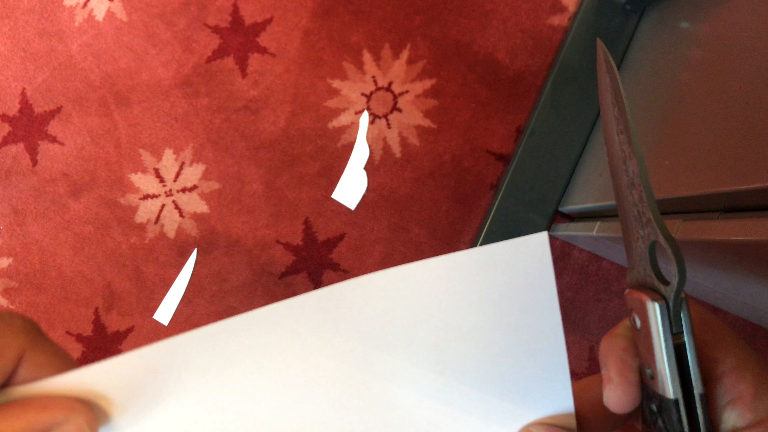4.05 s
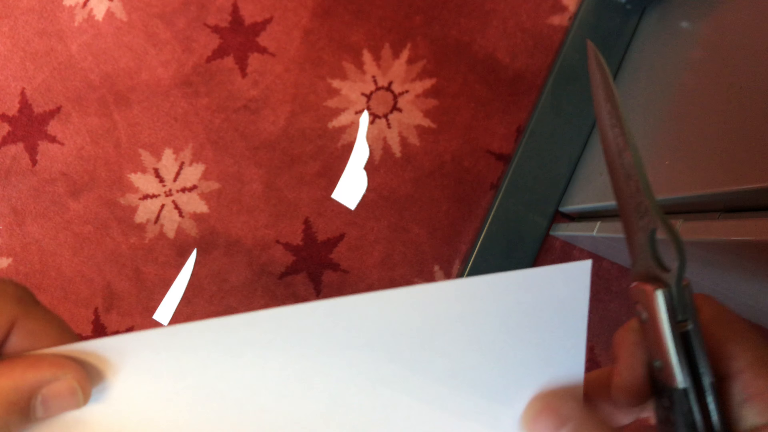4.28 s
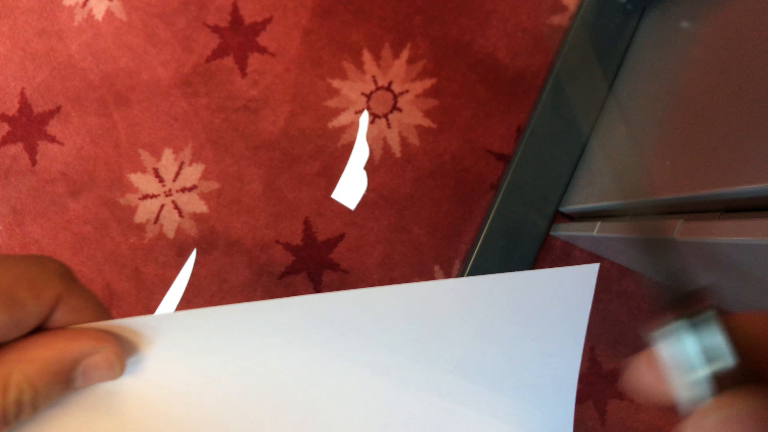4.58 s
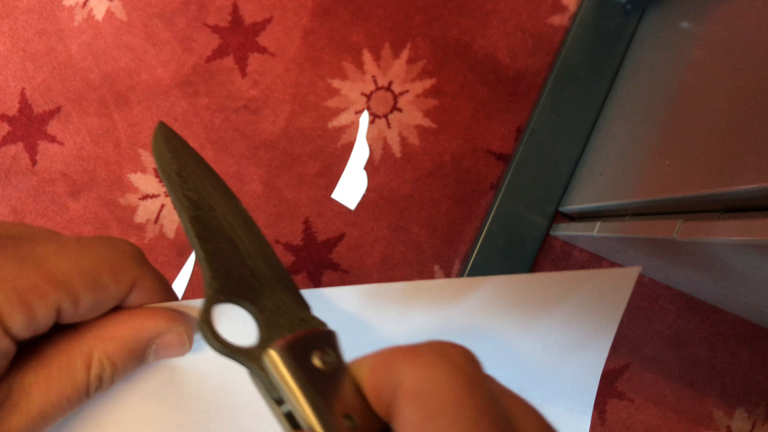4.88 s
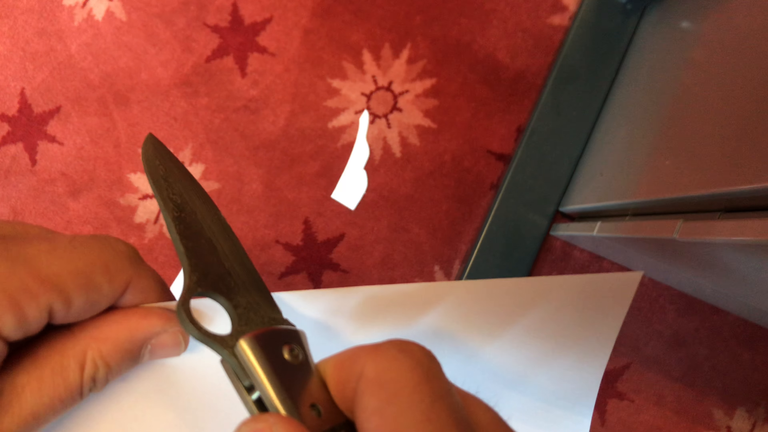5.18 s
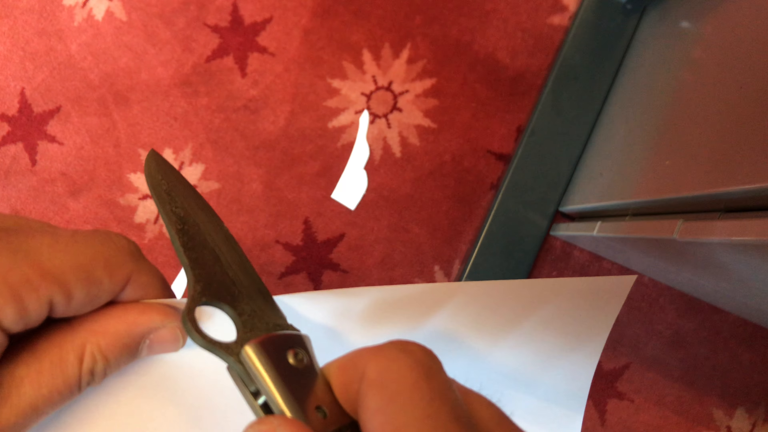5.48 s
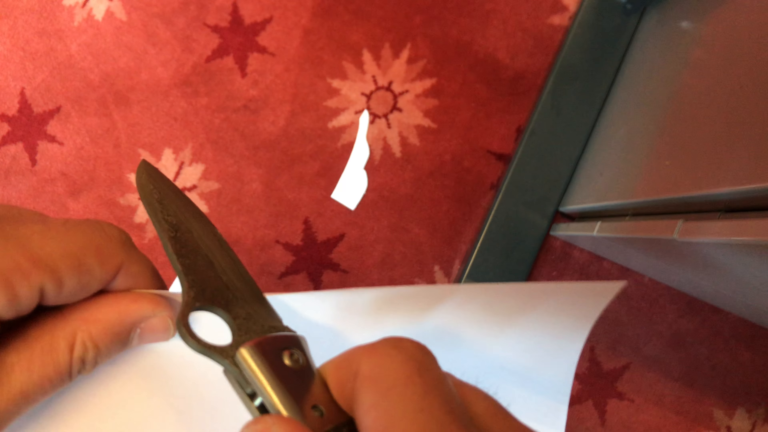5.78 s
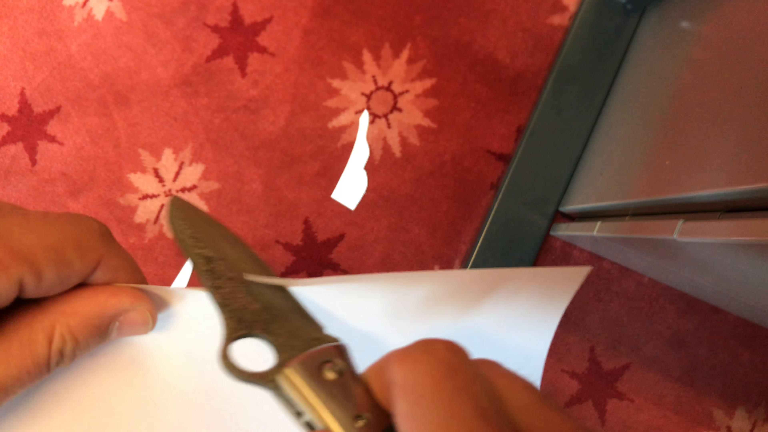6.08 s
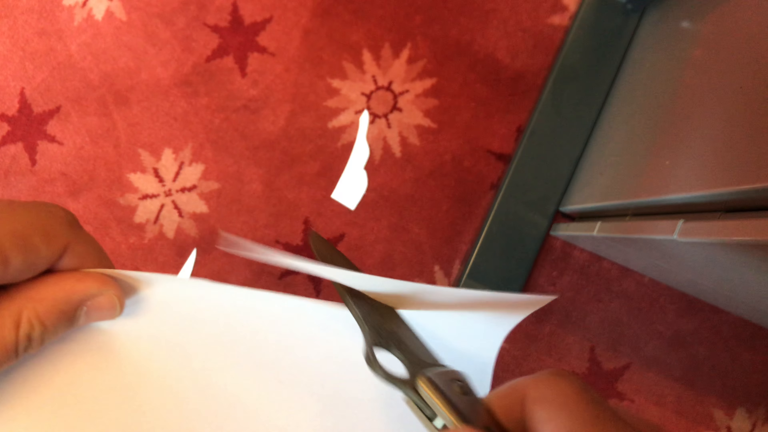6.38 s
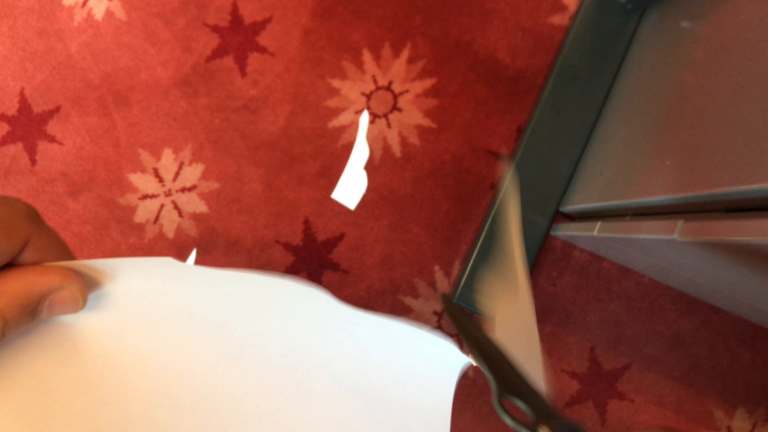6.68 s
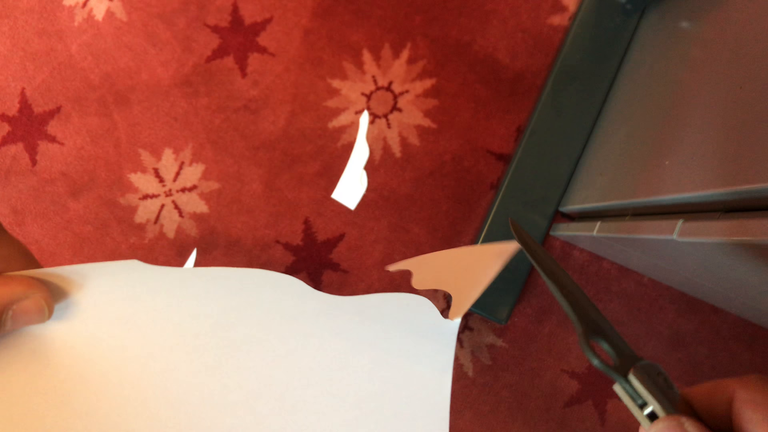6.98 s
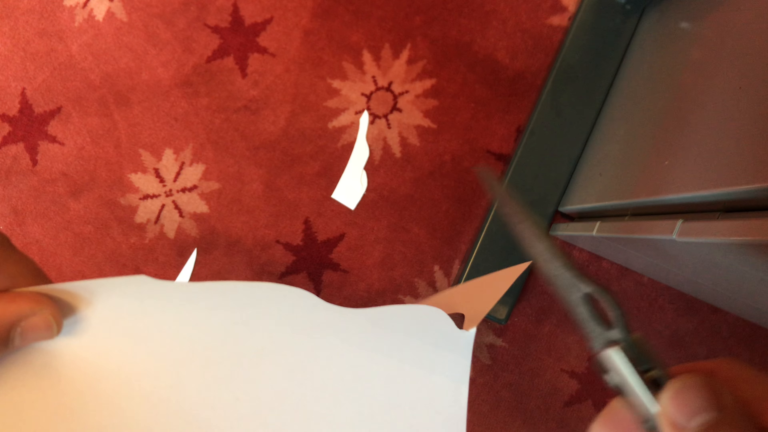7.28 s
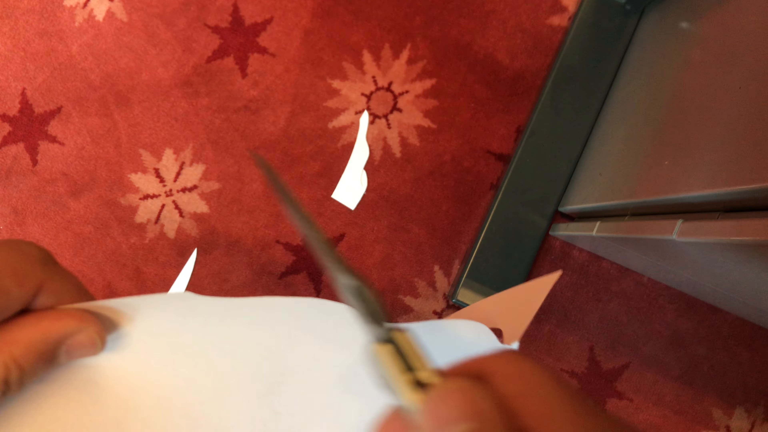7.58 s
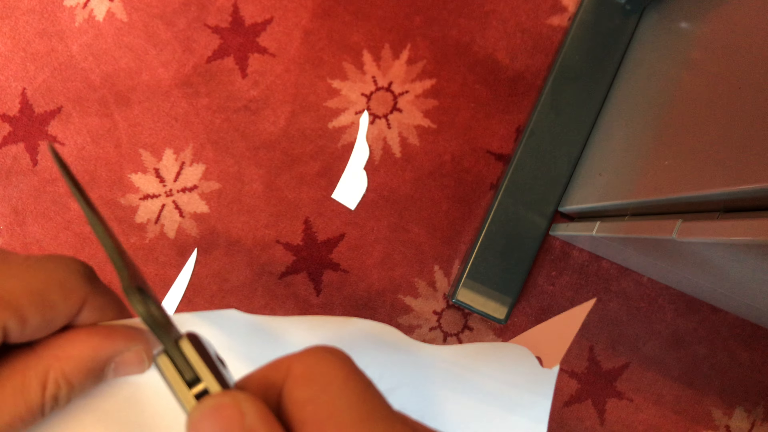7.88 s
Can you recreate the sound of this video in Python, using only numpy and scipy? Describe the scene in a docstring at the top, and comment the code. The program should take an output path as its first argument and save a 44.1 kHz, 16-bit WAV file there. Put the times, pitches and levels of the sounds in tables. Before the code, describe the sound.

Close up in a small, quiet room, a knife cuts twice through a hand-held sheet of paper. The first slice is coarse and crackly, followed by a light metallic click. Between the cuts the paper is shifted about, hissing against the skin and buckling with crisp snaps. After a lull, the blade grazes the rim and runs through in a bright, hissing stroke. Soft handling noises trail off over a faint mains hum.

```python
"""Slicing paper with a knife

A sharp folding knife cuts twice through a sheet of paper, close by in a small room. Each cut is a dense
train of parting fibres that the sheet radiates; before the second, the edge grazes the rim. Between the
cuts the sheet slides in the fingers, flexes and snaps, and the knife clicks once. Mains hum lies below."""
import sys
import numpy as np
from scipy import signal
from scipy.fft import rfft, irfft, next_fast_len
from scipy.io import wavfile
from scipy.ndimage import uniform_filter1d, map_coordinates

SR = 44100
rng = np.random.default_rng(int(sys.argv[2]) if len(sys.argv) > 2 else 0)


def put_to_file(sound):
    """Save the sound as 16-bit audio at rate SR, in the file named by the first command-line argument."""
    columns = np.atleast_2d(sound).T  # one column per channel
    safe = np.clip(columns, -1, 1)
    whole_steps = np.round(safe * 32767)
    wavfile.write(sys.argv[1], SR, whole_steps.astype(np.int16))


N = 358974


def amp(db):
    """Decibels to amplitude ratio."""
    return 10 ** (np.asarray(db) / 20)


def unit(x):
    """Normalisation to rms 1."""
    return x / np.sqrt(np.mean(x ** 2) + 1e-20)


def along(points, hz):
    """Interpolation of (Hz, value) points on a logarithmic frequency axis."""
    f, v = np.transpose(points)
    return np.interp(np.log(hz + 1), np.log(f + 1), v)


def seconds():
    """The time of every sample."""
    return np.arange(N) / SR


def stroke(start, length, db, growth_db, attack, release):
    """Envelope of a hand movement: linear onset, even slope in dB, exponential decay."""
    age = seconds() - start
    travel = np.clip(age / length, 0, 1) - .5
    onset = np.clip(age / attack + .5, 0, 1)
    return onset * amp(db + growth_db * travel) * np.exp(-np.maximum(age - length, 0) / release)


def swell(age, half):
    """Gaussian envelope about age 0; the half length is its standard deviation."""
    return np.exp(-.5 * np.minimum((age / half) ** 2, 100))


def wobble(rate):
    """Smooth random modulation, with rate knots a second."""
    return map_coordinates(rng.standard_normal(int(N * rate / SR) + 4), [np.arange(N) * rate / SR])


def filtered(x, response):
    """Linear filtering: the spectrum of x times a frequency response."""
    m = next_fast_len(N + 8192)
    return irfft(rfft(x, m) * response(np.fft.rfftfreq(m, 1 / SR)), m)[:N]


def coloured(x, spectrum, peaks=()):
    """Source and filter: x through a broad spectrum with Lorentzian resonances, at rms 1."""
    lift = lambda hz: sum(db / (1 + (2 * (hz - centre) / width) ** 2) for centre, width, db in peaks)
    return unit(filtered(x, lambda hz: amp(along(spectrum, hz) + lift(hz))))


def band(x, centre_hz, width_hz):
    """Band-pass filtering: one resonance of x, at rms 1."""
    return unit(filtered(x, lambda hz: 1 / (1 + (2 * (hz - centre_hz) / width_hz) ** 4)))


def under(hz, edge_hz):
    """A steep low-pass response."""
    return 1 / (1 + (hz / edge_hz) ** 10)


def registers(x, low_hz, high_hz):
    """A crossover: the low, middle and high bands of x, each at rms 1."""
    parts = (lambda hz: under(hz, low_hz),
             lambda hz: under(hz, high_hz) - under(hz, low_hz),
             lambda hz: 1 - under(hz, high_hz))
    return [unit(filtered(x, part)) for part in parts]


def fibres(rate, spread_db, smooth):
    """Shot noise: tiny breaks of random size, rate a second, over a share of smooth friction."""
    breaks = (rng.random(N) < rate / SR) * rng.choice([-1, 1], N)
    sizes = amp(spread_db * np.clip(rng.standard_normal(N), -2, 2))
    return unit(unit(breaks * sizes) + smooth * rng.standard_normal(N))


def bundles(rate, size_db, t60):
    """A Poisson process: whenever a bundle of fibres lets go, the gain jumps and relaxes."""
    jumps = (rng.random(N) < rate / SR) * rng.uniform(.5, 1, N)
    fall = amp(-60 * np.arange(SR // 20) / SR / t60)
    return 1 + amp(size_db) * signal.fftconvolve(jumps, fall)[:N]


def drifting(x, depth_db, size=384):
    """Interference: reflections from the moving hand and sheet lift and hollow random narrow bands."""
    z = signal.stft(x, nperseg=size)[2]
    field = rng.standard_normal(z.shape)
    for _ in range(2):
        field = uniform_filter1d(uniform_filter1d(field, size=3, axis=0), size=13, axis=1)
    return signal.istft(z * amp(depth_db * unit(field)), nperseg=size)[1][:N]


def background():
    """The noise floor: low room noise and mains harmonics that waver in level and phase."""
    # Mains hum. Each row: frequency in Hz, rms level in dB.
    harmonics = [(50, -74.5), (100, -64), (300, -77)]
    # Spectrum of the quiet room. Each row: frequency in Hz, relative density in dB.
    air = [(13, -48), (22, -26.5), (43, -7.5), (71, -8.5), (86, -11.5), (107, -4.5), (168, -9), (255, -8.5),
           (365, -19), (397, -17), (496, -23.5), (10900, -44), (15200, -37), (17000, -42.5)]
    hum = np.zeros(N)
    for hz, db in harmonics:
        peak = np.sqrt(2) * amp(db + 0.93 * wobble(2))
        hum += peak * np.sin(2 * np.pi * hz * seconds() + 0.14 * wobble(0.67))
    return hum + amp(-59) * coloured(rng.standard_normal(N), air)


def room(x):
    """Reverberation: the walls answer after 5 ms, and furnishings absorb the treble fastest."""
    # Room decay. Each row: frequency in Hz, T60 in seconds.
    decay_times = [(150, 0.53), (1000, 0.64), (3000, 0.57), (8000, 0.29), (16000, 0.15)]
    hz, t, z = signal.stft(rng.standard_normal(SR), SR, nperseg=256)
    colour = amp(along([(100, 6), (1200, 0), (3500, -1), (8000, 2), (16000, -12.5)], hz))[:, None]
    fade = amp(-60 * t / along(decay_times, hz)[:, None])
    tail = signal.istft(z * fade * colour, SR, nperseg=256)[1]
    return signal.fftconvolve(x, np.pad(tail / np.linalg.norm(tail), (round(.005 * SR), 0)))[:N]


def handling():
    """Sliding friction: skin on paper hisses and rustles, and the held sheet ticks faintly."""
    # Finger slides, and the rustle dying away after each cut.
    # Each row: start and length in seconds; hiss, growth and relative rustle in dB.
    rustles = [(0, 0.12, -57.5, -8.5, 8.5), (.142, 0.12, -58, -17.5, 9.5), (0.254, .28, -58.5, -14.5, 3),
               (0.576, .12, -64, -10.5, 5), (0.718, 0.082, -53.5, 5, 4), (1.486, 0.053, -50, -6, 6.5),
               (1.55, 0.023, -47, -4, 4.5), (1.567, 0.16, -72, -15, 11), (1.783, 2.7, -70, -1, 3),
               (1.973, .11, -59, 5.5, 0.5), (2.104, 0.28, -62, 5.5, 3.5), (2.245, .11, -52, 2.5, -13),
               (2.397, 0.051, -58, 17, 1.5), (2.455, 0.0064, -40.5, 0.5, 1.5),
               (2.678, 0.14, -61.5, -14.5, -2), (2.805, 0.092, -50.5, -14, 2.5), (3.016, 0.11, -56, -6, 2),
               (3.119, 0.059, -49.5, -4, 3), (3.19, .21, -58.5, -3, 4.5), (3.413, 0.073, -54, -1.5, 3.5),
               (3.495, 0.059, -47.5, -11.5, 0), (3.572, 0.085, -50, 1.5, 7.5), (3.557, .02, -40.5, -2, 1),
               (3.645, 0.14, -62, -14, 8.5), (3.795, 0.048, -53.5, 4, 0.5), (3.849, 0.1, -54, -4, 2),
               (4.007, 0.24, -50, 0.5, -0.5), (4.327, 0.05, -54, -20, -4), (4.453, 0.023, -59, -1, 2),
               (4.488, .004, -43, 2, 4.5), (5.56, 0.0032, -55.5, -21, 1.5), (6.781, .12, -50.5, -17, 6.5),
               (6.902, .27, -63, -8.5, -0.5), (7.868, 0.063, -63.5, 2, 6.5)]
    # Friction spectrum. Each row: frequency in Hz, relative density in dB.
    spectrum = [(180, -21.5), (300, -7), (498, -14.5), (560, -3), (760, -6.5), (995, 3), (1770, -3),
                (3720, -3), (4480, -8), (5040, -9), (9410, -14), (10400, -17), (17000, -15.5)]
    # Its peaks and dips. Each row: centre and width in Hz, lift in dB.
    peaks = [(410, 100, 4.5), (1040, 200, -5.5), (4290, 280, 4.5)]
    flutter = amp(1.6 * wobble(40) + wobble(250)) * bundles(12, 3, t60=.005)
    grain = drifting(flutter * fibres(4000, 3.5, smooth=1), depth_db=2.2)
    low, middle, hiss = registers(coloured(grain, spectrum, peaks), 1080, 3900)
    rustle = unit(amp(-5.5) * low + middle)
    rustling = np.zeros(N)
    for start, length, db, growth_db, rustle_db in rustles:
        attack = 0.011 + 0.116 * length * (growth_db > 0)  # a growing slide eases in
        level = stroke(start, length, db, growth_db, attack, release=0.004)
        rustling += level * (hiss + amp(rustle_db) * rustle)
    ticks = amp(-82.5) * coloured(fibres(16, 2.7, smooth=0), spectrum)
    return rustling + ticks


def waft():
    """Near-field flow: the moving sheet pushes air at the microphone."""
    # Pushes of air. Each row: start and length in seconds, level and growth in dB.
    pushes = [(3.0, 0.74, -55.5, 2.5), (3.8, 0.68, -57, 11), (6.738, .11, -45.5, -7)]
    # Flow spectrum. Each row: frequency in Hz, relative density in dB.
    spectrum = [(15, -31), (25, -12.5), (75, -7), (248, -3.5), (318, -16.5), (500, -12), (650, -40),
                (1100, -120)]
    level = sum(stroke(*row, attack=0.028, release=0.051) for row in pushes)
    return level * coloured(rng.standard_normal(N), spectrum)


def burst(gain, envelope):
    """A transient: spectrally shaped noise with the rms of its envelope."""
    noise = irfft(rfft(rng.standard_normal(len(envelope))) * gain, len(envelope))
    return unit(noise * envelope) * np.sqrt(np.mean(envelope ** 2))


def crease(shape, thump_shape, db, pitch_hz, thump_db, treble_db=0, octaves=0.68):
    """Radiation from one buckle: a hollow resonance, crisp fibres above it, a push of air below."""
    # Spectra of sheet, creasing fibres and pushed air. Each row: frequency in Hz, relative density in dB.
    sheet = [(100, -31.5), (250, 12), (420, 0.5), (560, 5.5), (780, -0.5), (1100, -2.5), (2300, -10),
             (3400, -8), (4500, -22.5), (8000, -33), (17000, -40.5)]
    crisp = [(1500, -64), (3500, 7.5), (4400, 2), (7000, -6), (10500, -15), (17000, -7.5)]
    thump = [(25, -26), (52, 6), (100, -7), (180, 0.5), (280, -8), (420, -9.5), (900, -38), (3000, -89.5)]
    hz = np.fft.rfftfreq(len(shape), 1 / SR)
    hollow = amp(along(sheet, hz)) / (1 + (np.log2((hz + 1) / pitch_hz) / octaves) ** 2)
    # Harder and tighter buckles are crisper than a middling one of -30 dB at 1500 Hz.
    crisp_db = -16.5 + .4 * (db + 30) + 4 * np.log2(pitch_hz / 1500) + treble_db
    return amp(db) * (burst(hollow, shape)
                      + amp(crisp_db) * burst(amp(along(crisp, hz)), shape)
                      + amp(thump_db) * burst(amp(along(thump, hz)), thump_shape))


def buckling(size=16384):
    """Elastic instability: the sheet snaps through with a crack, or bends in a duller swell."""
    # Snaps. Each row: start in seconds, level in dB, pitch in Hz, relative thump in dB, T60 in seconds.
    snaps = [(0.146, -37.5, 1420, -11, 0.032), (0.231, -29.5, 1970, -12, 0.021),
             (0.614, -42.5, 1810, -5, 0.034), (0.72, -39.5, 2000, -27, 0.028),
             (2.1275, -31.5, 1430, -32, 0.02), (2.437, -37.5, 1600, -7, 0.062),
             (3.083, -27.5, 1813, -26, 0.024), (3.322, -29.5, 1080, -16, 0.027),
             (3.3626, -26.5, 1610, -7.5, 0.03), (3.39, -29, 1118, -2.5, 0.026),
             (3.503, -28, 1030, -3.5, 0.045), (3.572, -15.5, 1023, -16, 0.027),
             (3.6293, -16, 2300, -10, 0.055), (3.638, -24.5, 920, -29, 0.051),
             (4.02, -31.5, 1150, -9, 0.077), (4.327, -42.5, 2800, -16, 0.037),
             (4.49, -33.5, 1170, -19, 0.045), (4.609, -50, 2610, -15, .07), (4.8309, -42, 980, -21, .07),
             (5.384, -42.5, 964, 0, 0.088), (7.824, -54, 3000, -6, 0.072), (7.968, -59, 2500, -6, 0.034)]
    # Bends. Each row: time in seconds, level in dB, pitch in Hz, relative thump in dB,
    # half length in seconds.
    flexes = [(0.157, -36, 597, -8, 0.0049), (0.22, -39.5, 4360, -7, 0.0034),
              (0.272, -42.5, 4100, -13, 0.015), (1.456, -36.5, 740, -17, 0.025),
              (2.504, -32.5, 1820, -24, .011), (2.55, -49, 1420, -20, 0.07), (2.942, -44, 1250, -7.5, 0.02),
              (3.07, -23.5, 2260, -16.5, 0.0026), (3.092, -37, 1540, -14, .023),
              (3.137, -36.5, 3800, -12, 0.0038), (3.159, -37.5, 1250, -21, .013),
              (3.258, -44.5, 3200, -1, 0.005), (3.289, -43.5, 1150, -8, 0.017),
              (3.363, -33.5, 1480, -7.5, .014), (3.658, -34, 2040, -12.5, .013),
              (3.715, -41.5, 1475, -27.5, 0.055), (4.235, -47.5, 3530, 3, 0.0063),
              (4.399, -33, 1130, -6.5, 0.014), (4.436, -46.5, 915, 4.5, .014),
              (7.926, -56, 795, 2.5, 0.012)]
    t = np.arange(size) / SR
    out = np.zeros(N + 2 * size)
    crack = (1 + 0.48 * amp(-60 * t / 0.0048)) * (1 - np.exp(-t / 0.0005))
    for start, db, hz, thump_db, t60 in snaps:
        fall_db = -60 * t / t60
        thump_shape = amp(fall_db / 2) * (1 - np.exp(-t / 0.00073))
        out[size + round(start * SR):][:size] += crease(amp(fall_db) * crack, thump_shape, db, hz, thump_db)
    for time, db, hz, thump_db, half in flexes:
        shape = swell(t - t.mean(), half)
        out[size // 2 + round(time * SR):][:size] += crease(shape, shape, db, hz, thump_db, treble_db=-6.5)
    return out[size:size + N]


def knife_click(clink_hz=5500, clink_db=-17, clink_t60=.28):
    """Modal damping: the hand mutes a small steel contact, and only its high modes ring on."""
    # The contact. Each row: start in seconds, level in dB, T60 in seconds.
    clicks = [(1.774, -34.5, 0.055)]
    # Impact spectrum. Each row: frequency in Hz, relative density in dB.
    spectrum = [(200, -8), (1000, -4), (3000, -6.5), (7500, 0), (11000, -16), (17000, -17)]
    # Steel modes. Each row: centre and width in Hz, lift in dB.
    modes = [(1750, 100, 18), (3870, 810, 13), (6800, 200, 9), (7300, 370, 3), (8400, 250, 6)]
    steel = coloured(rng.standard_normal(N), spectrum, modes)
    clink = filtered(steel, lambda hz: 1 - under(hz, clink_hz))
    out = np.zeros(N)
    for start, db, t60 in clicks:
        age = np.maximum(seconds() - start, 0)
        ring = steel * amp(-60 * age / t60) + clink * amp(clink_db - 60 * age / clink_t60)
        out += amp(db) * (1 - np.exp(-age / 0.00094)) * ring
    return out


def graze():
    """Frictional excitation: before it bites, the edge saws on the rim and rings blade and sheet."""
    # Strokes on the rim. Each row: start and length in seconds, level and growth in dB.
    strokes = [(5.729, 0.058, -53.5, 16), (5.893, 0.31, -37.5, 1)]
    # Scraping spectrum. Each row: frequency in Hz, relative density in dB.
    spectrum = [(180, -27.5), (300, -14.5), (747, -9.5), (930, -3), (1420, -18), (1570, -11.5),
                (2320, -13.5), (3840, -10), (5770, -24.5), (6940, -19.5), (11000, -25.5), (14600, -18),
                (17000, -23)]
    # Resonances of blade and taut sheet. Each row: centre and width in Hz, lift in dB.
    peaks = [(940, 330, 4), (1250, 130, 10.5), (2350, 90.6, 5), (4100, 400, 5.5), (6770, 650, 9),
             (9850, 300, 8.5), (11300, 400, 2.5), (14700, 350, 3.5)]
    level = sum(stroke(*row, attack=0.027, release=.012) for row in strokes)
    chatter = drifting(amp(wobble(70)) * fibres(4000, 3, smooth=.7), depth_db=2)
    return level * coloured(chatter, spectrum, peaks)


def singing():
    """Resonance: the rasp excites modes that come and go with the free length of the taut sheet."""
    # Modes. Each row: time in seconds, level in dB, centre and width in Hz, half length in seconds.
    modes = [(1.381, -27.5, 4270, 2200, 0.012), (1.394, -31.5, 1060, 220, 0.016),
             (5.928, -41, 957, 160, 0.019), (6.321, -34.5, 980, 120, .017), (6.6, -26.5, 3850, 400, 0.046),
             (6.745, -29.5, 1170, 160, 0.0062)]
    rasp = rng.standard_normal(N)
    return sum(amp(db) * swell(seconds() - time, half) * band(rasp, hz, width)
               for time, db, hz, width, half in modes)


def cut(effort, spectrum, peaks, low_hz, high_hz, crackle_db, loosen_db, fade_s=0.0047):
    """Fracture: fibres part in clumps and spurt at snags; the low band shifts as the strip loosens."""
    # The edge catches and rips on. Each row: time in seconds, level in dB, half length in seconds.
    snags = [(1.245, -27, 0.0073), (1.293, -30, 0.0046), (1.323, -25, .011), (1.395, -31.5, 0.0066),
             (1.443, -23.5, 0.0015), (6.713, -22.5, 0.011), (6.76, -25, .006)]
    t = seconds()
    times, *levels = np.transpose(effort)
    rasp_db, fizz_db = (np.interp(t, times, level) for level in levels)
    start, end = times[0], times[-1]
    gate = np.clip(np.minimum(t - start, end - t) / fade_s + .5, 0, 1)
    travel = np.clip((t - start) / (end - start), 0, 1)
    clumps = amp(.7 * wobble(330)) * bundles(90, crackle_db, t60=.011)
    tearing = drifting(clumps * fibres(5000, 2.6, smooth=.6), depth_db=2.1)
    body, rasp, fizz = registers(coloured(tearing, spectrum, peaks), low_hz, high_hz)
    steady = amp(rasp_db - 1.5)
    snag_power = sum((amp(db) * swell(t - time, half)) ** 2 for time, db, half in snags)
    upper = np.sqrt(steady ** 2 + snag_power) * (rasp + amp(fizz_db) * fizz)
    lower = steady * amp(-8 + loosen_db * travel ** 2) * body
    return gate * (upper + lower)


def first_cut():
    """Coarse fracture: a crackling slice that gains body as it advances."""
    # Work of the edge. Each row: time in seconds, rasp in relative dB, fizz in dB above the rasp.
    effort = [(0.834, -46.5, -6), (0.85, -38.5, -4), (0.984, -37.5, -5.5), (1.074, -32, -6),
              (1.298, -28.5, -7), (1.326, -31, -5), (1.362, -35, -1), (1.38, -27.5, -1), (1.49, -37, -8.5)]
    # The sheet's spectrum. Each row: frequency in Hz, relative density in dB.
    spectrum = [(88, -61), (150, -11), (214, -10), (312, -17), (454, -14), (554, -6), (791, -3), (1220, -1),
                (1970, -2), (3220, -3.5), (5720, -16.5), (7550, -16), (10600, -25.5), (14500, -24),
                (17000, -23)]
    # Its peaks and dips. Each row: centre and width in Hz, lift in dB.
    peaks = [(573, 150, 1.5), (790, 48, -10.5), (3324, 400, 3), (4190, 210, -5), (7500, 1200, 2.5),
             (14350, 220, 8.5)]
    return cut(effort, spectrum, peaks, low_hz=1228, high_hz=3700, crackle_db=-2, loosen_db=2.5)


def second_cut():
    """Fine fracture: a smoother, brighter slice that loses body as it advances."""
    # Work of the edge. Each row: time in seconds, rasp in relative dB, fizz in dB above the rasp.
    effort = [(6.15, -37.5, -7), (6.264, -26.5, -3.5), (6.346, -26.5, -8), (6.39, -28.5, 0.5),
              (6.48, -28, -7.5), (6.584, -22, -9.5), (6.73, -28, 4.5), (6.776, -25, 4.5),
              (6.785, -41.5, -2)]
    # The sheet's spectrum. Each row: frequency in Hz, relative density in dB.
    spectrum = [(88, -57.5), (150, -20.5), (246, -13), (482, -12.5), (611, -7), (689, -12), (1000, -4),
                (1380, -8.5), (1930, -7.5), (2090, -8), (3780, -4), (4890, -8.5), (7120, -10.5),
                (10200, -16), (17000, -18)]
    # Its peaks and dips. Each row: centre and width in Hz, lift in dB.
    peaks = [(474, 33, -7.5), (1040, 120, -4.5), (4000, 600, -1), (4920, 600, -7), (6940, 190, -0.5),
             (14700, 270, 1)]
    return cut(effort, spectrum, peaks, low_hz=1322, high_hz=4590, crackle_db=-10.5, loosen_db=-5)


def scene():
    """Superposition: the direct sound of knife and paper, its reverberation and the noise floor."""
    cuts = first_cut() + second_cut() + graze() + singing()
    handled = handling() + waft() + buckling() + knife_click()
    reverberation = room(amp(-21.5) * cuts + amp(-15) * handled)
    return (cuts + handled + reverberation + background())[None]


def record(dry):
    """Band limiting: the response falls to zero across 300 Hz about the top frequency."""
    top_hz = 17300
    return filtered(dry[0], lambda hz: np.clip((top_hz - hz) / 300 + .5, 0, 1))[None]


dry = scene()
out = record(dry)
put_to_file(out)
```